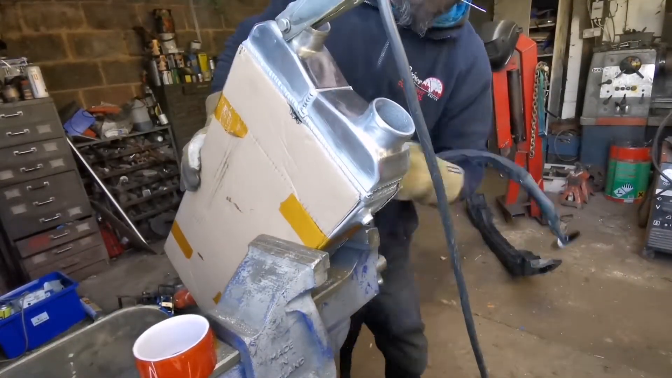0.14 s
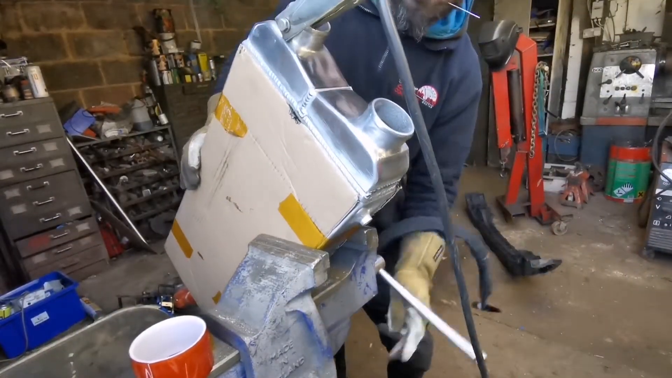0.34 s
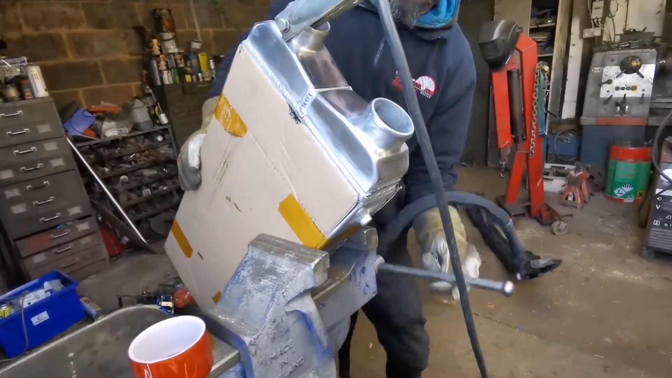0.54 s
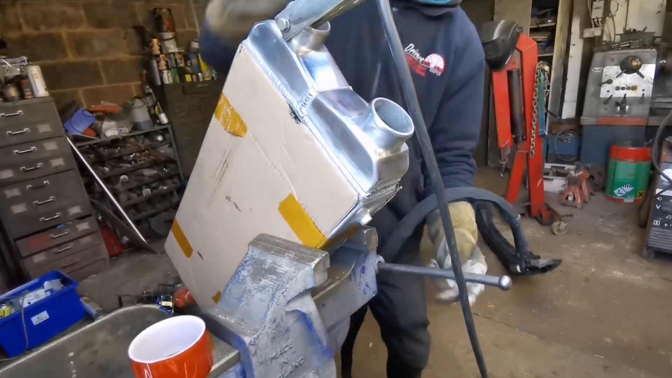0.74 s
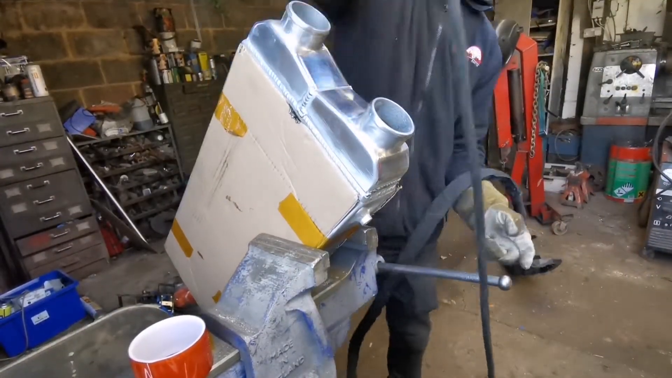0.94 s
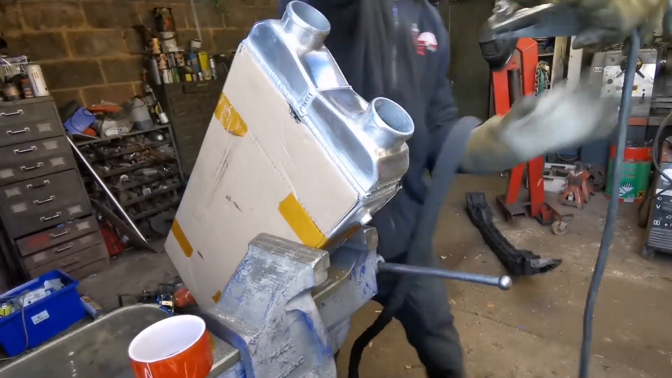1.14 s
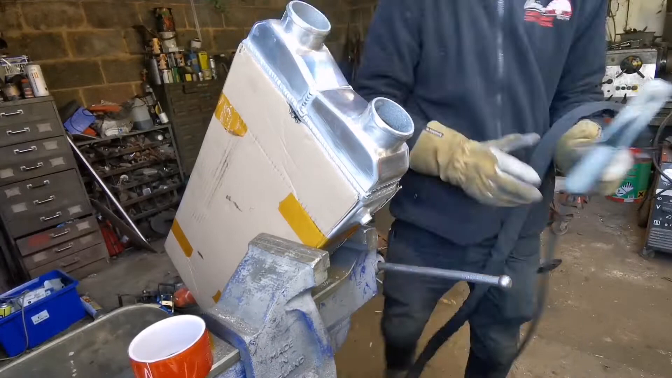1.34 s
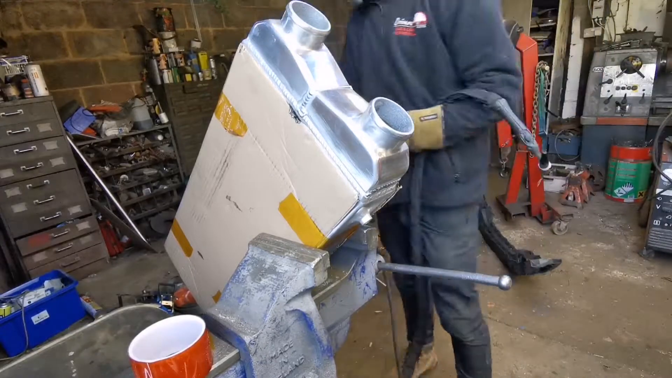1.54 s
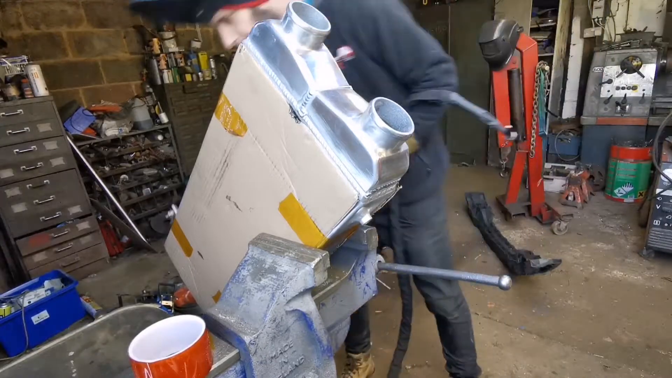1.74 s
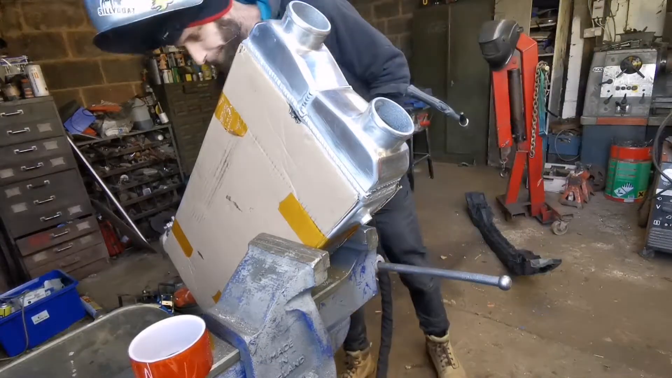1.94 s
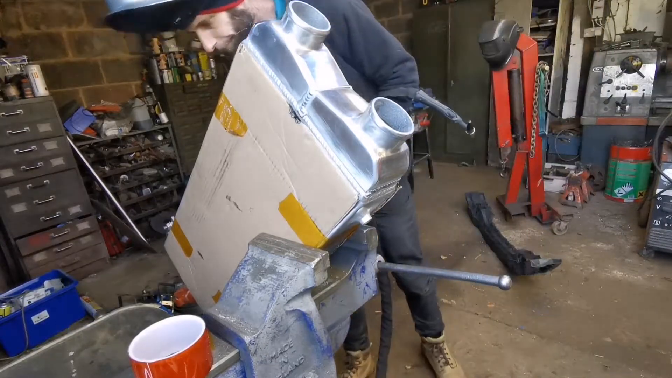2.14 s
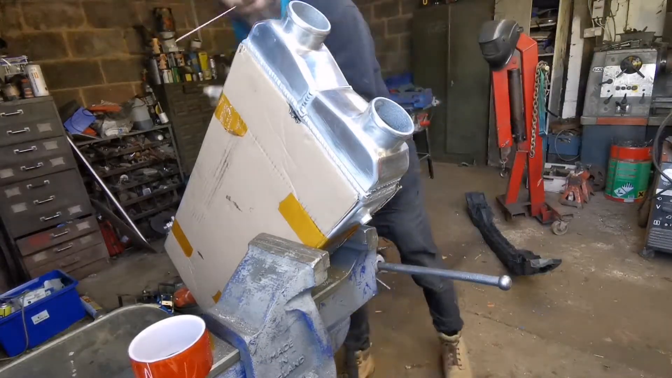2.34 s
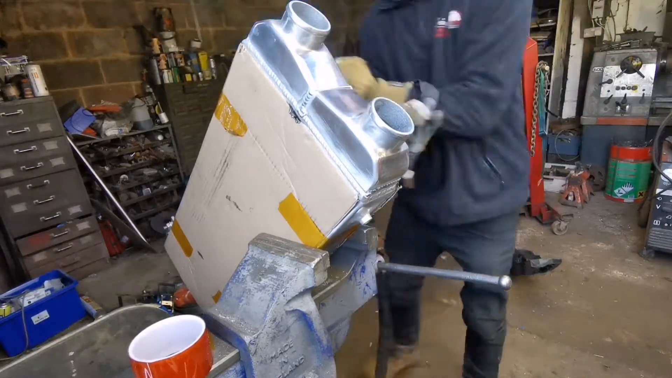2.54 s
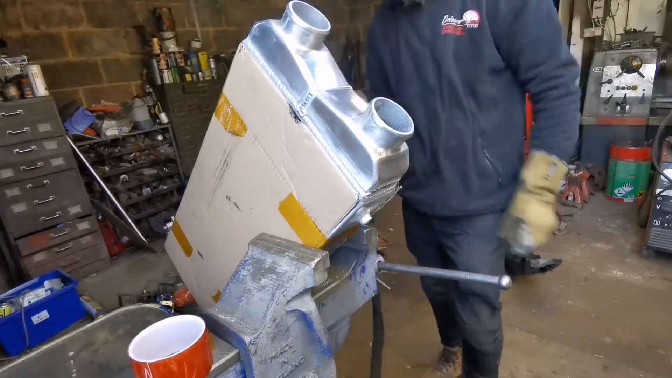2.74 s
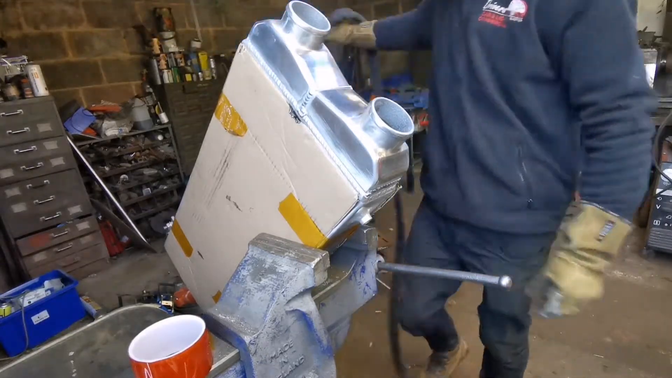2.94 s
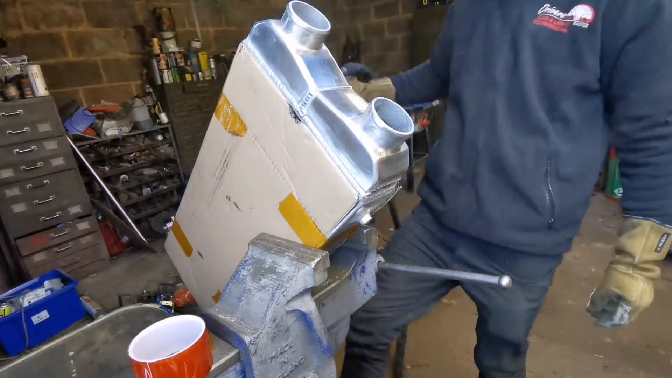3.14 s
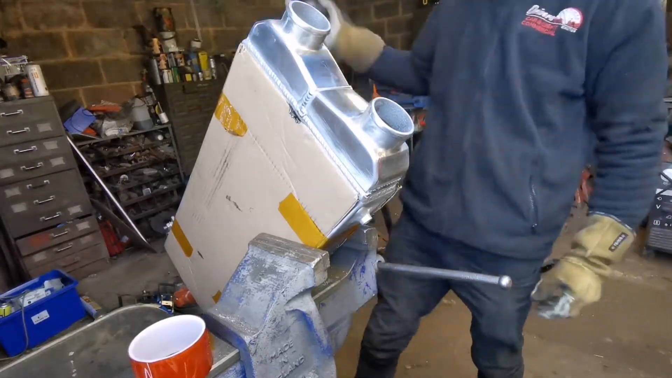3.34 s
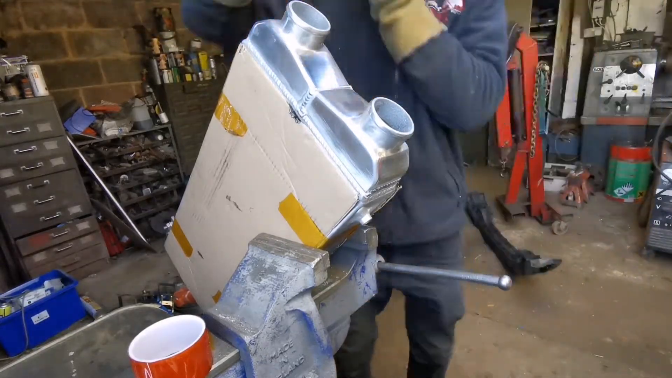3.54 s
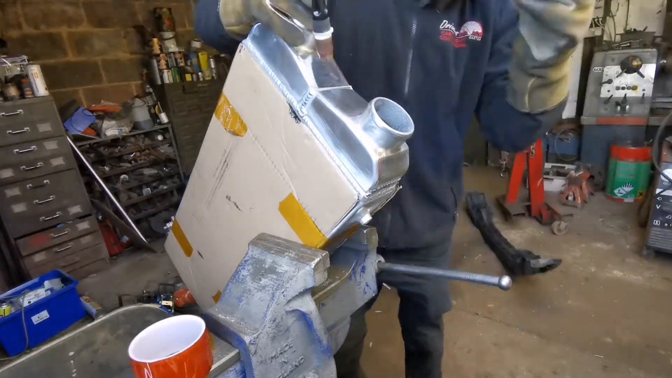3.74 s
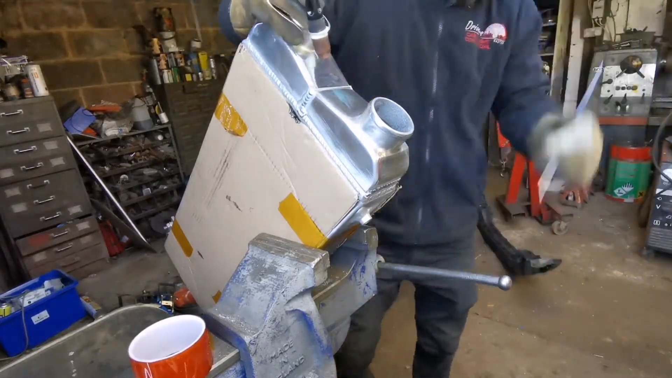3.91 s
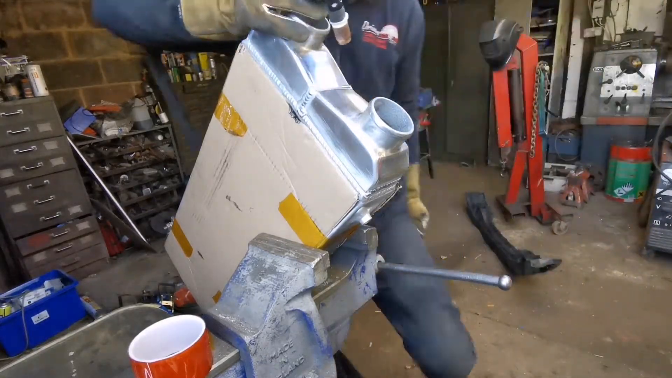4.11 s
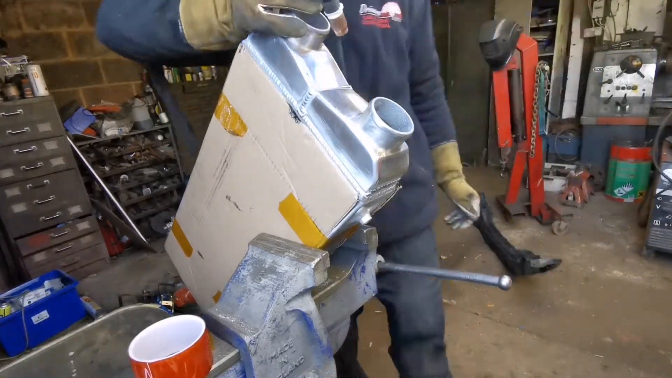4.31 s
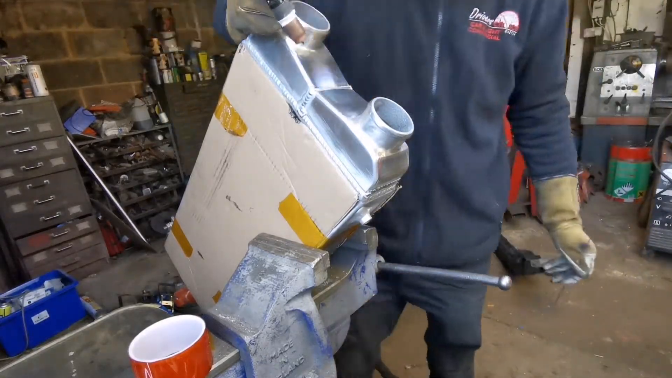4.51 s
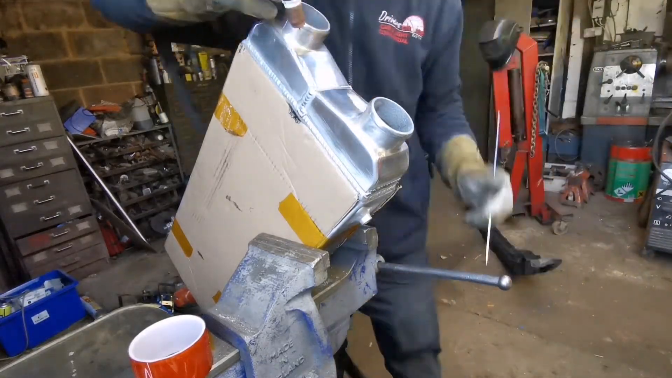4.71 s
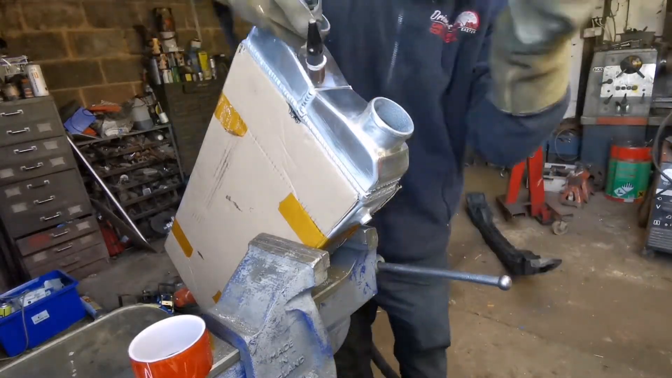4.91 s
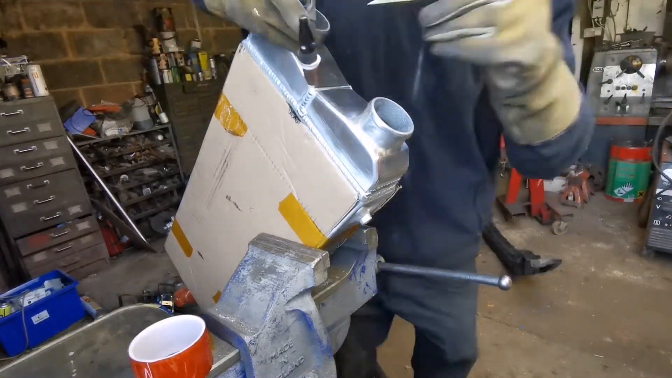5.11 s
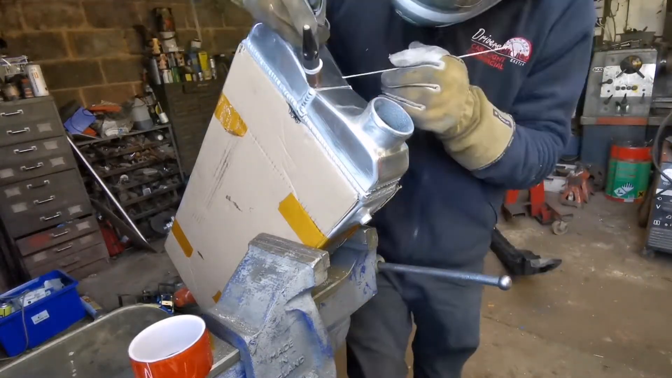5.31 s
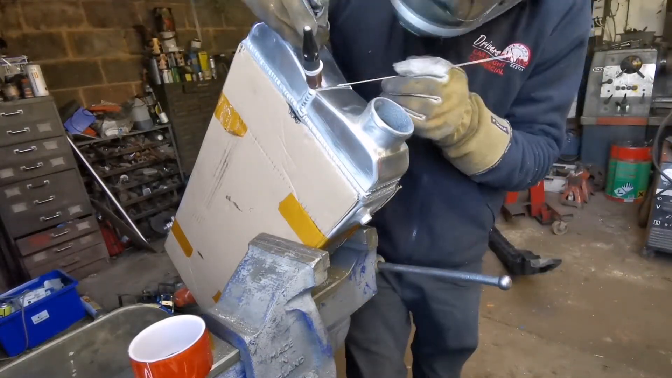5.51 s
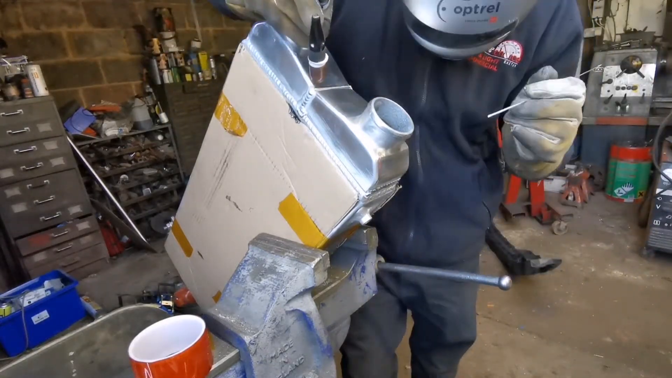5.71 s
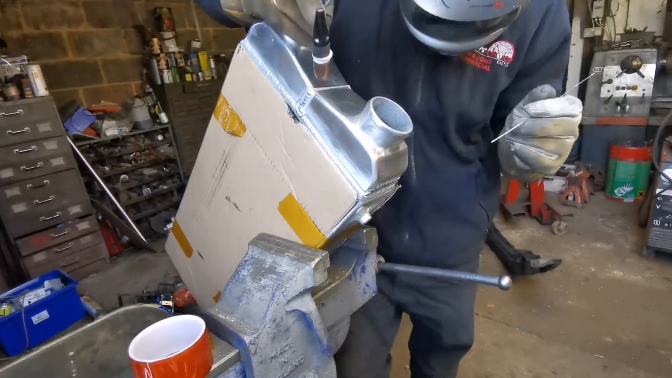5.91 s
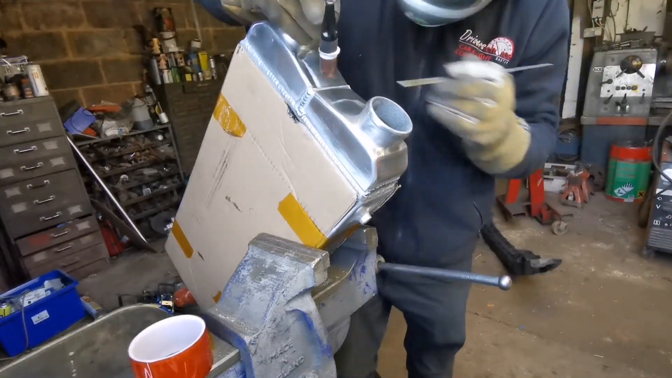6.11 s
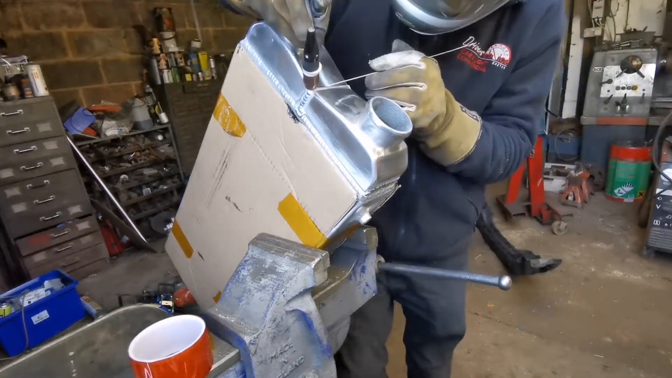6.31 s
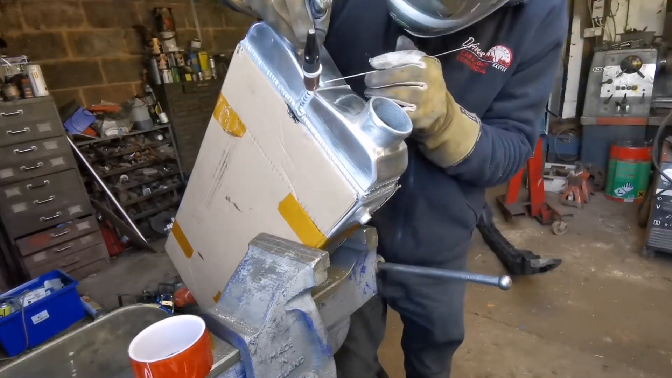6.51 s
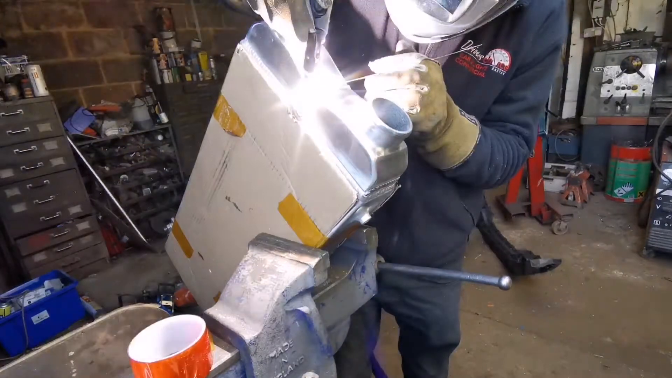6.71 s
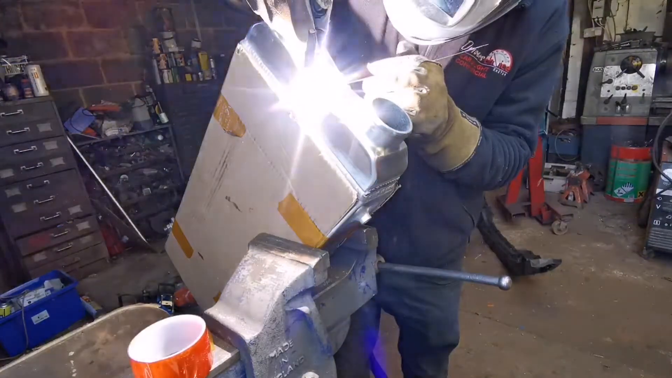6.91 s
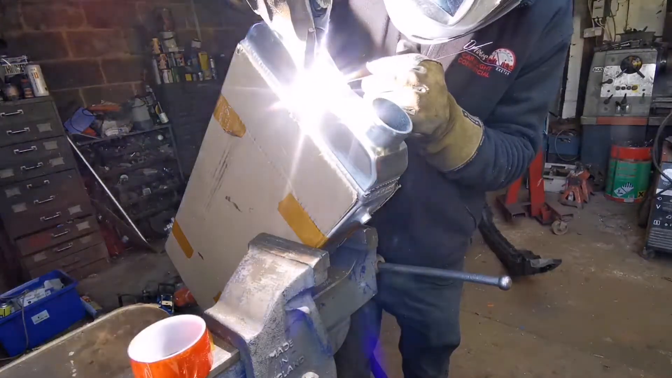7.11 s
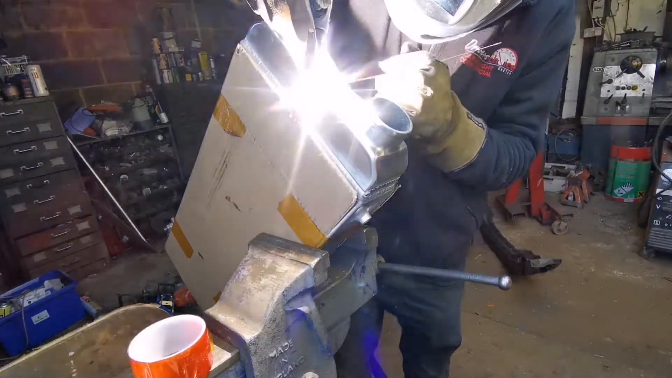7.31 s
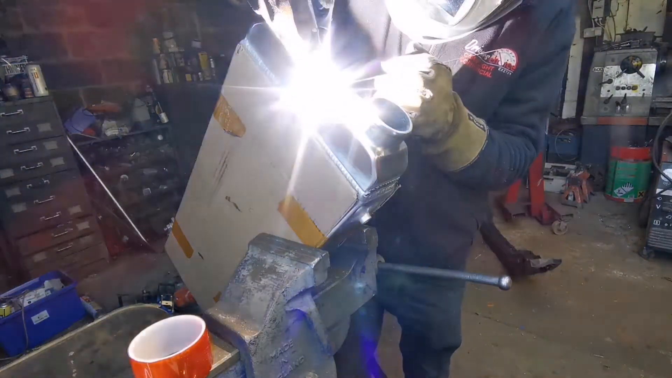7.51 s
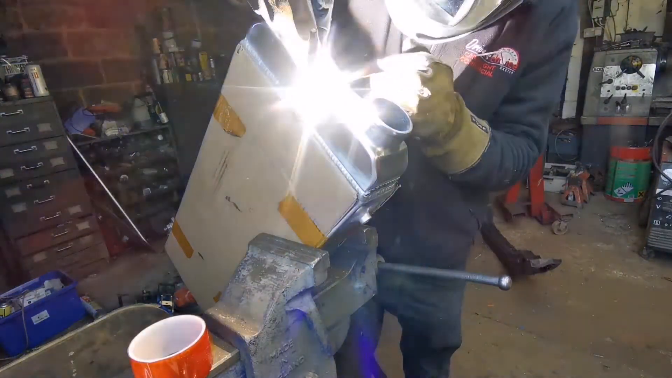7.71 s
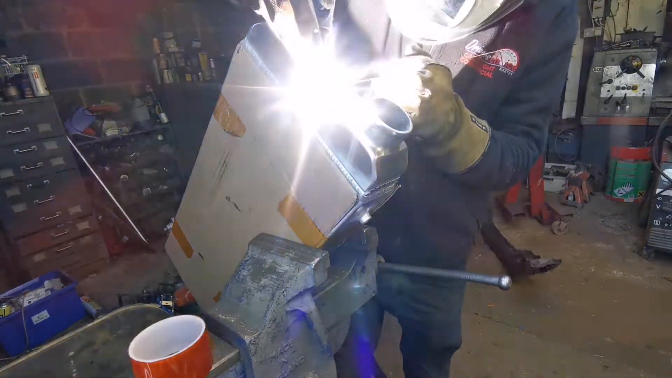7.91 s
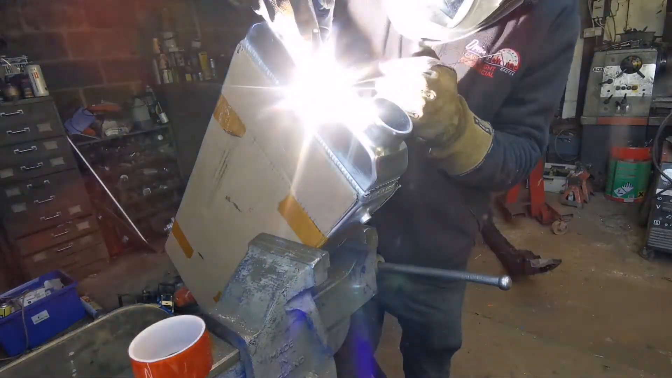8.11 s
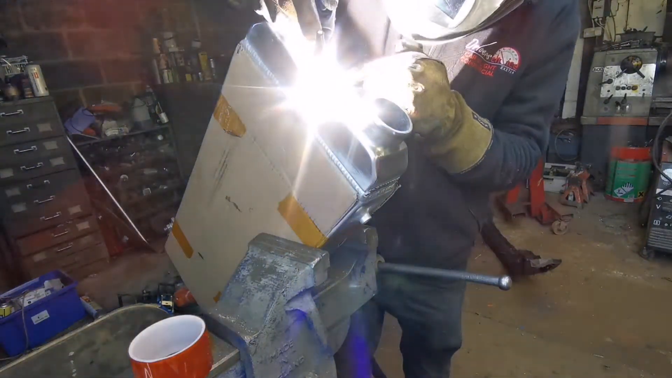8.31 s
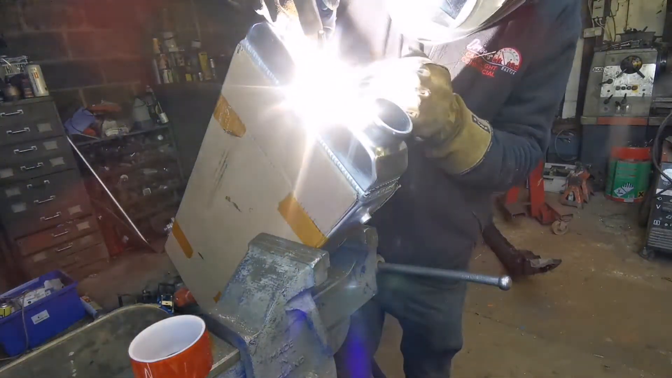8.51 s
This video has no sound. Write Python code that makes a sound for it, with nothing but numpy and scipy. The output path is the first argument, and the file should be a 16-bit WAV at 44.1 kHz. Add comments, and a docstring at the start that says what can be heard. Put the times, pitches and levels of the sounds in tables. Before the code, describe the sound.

Quiet preparations come first, with cloth and gloves brushing metal, a sharp double-toned clack, a cluster of hollow knocks and tiny torch ticks over constant fan rush. Then a welding arc ignites with a gas puff and sizzling pops, settling into a harsh low buzz with bright hissing snaps, its hum dipping rhythmically late on. Heard close up in a small hard-walled workshop, in stereo.

```python
"""A welder settles an aluminium tank in a vice and handles the torch, then strikes an AC TIG arc in a small workshop.
First, over the fan's steady filtered noise, struck modes boom and clink while noise bursts thud, scuff and clack.
A starting spark then frizzles with tiny oxide pops, and the arc holds: each reversal of the current snaps it, twice
a cycle, as a pulse train coloured into a hollow buzz and a hissing crackle, over a hum of two sines.
Last, rhythmic dabs of filler rod choke the hum. Two ports with different resonances pick up the whole."""
import sys
import numpy as np
from scipy import signal
from scipy.fft import rfft, irfft
from scipy.io import wavfile

SR = 44100
rng = np.random.default_rng(int(sys.argv[2]) if len(sys.argv) > 2 else 0)


def transcribe(signal):
    """Save signal, clipped to [-1, 1], as a 16-bit WAV file at the path in sys.argv[1]."""
    frames = np.atleast_2d(signal).T
    limited = np.clip(frames, -1, 1)
    pcm = np.round(limited * 32767).astype(np.int16)
    wavfile.write(sys.argv[1], SR, pcm)


N = 377055
T = np.arange(N) / SR

# the starting spark fires, then the arc holds (s)
SPARK_S, ARC_S = 6.526, 6.612
# the torch and filler rod touch metal: start_s, level_db, pitch_hz, t60_s
TOUCHES = [(3.017, -44.5, 4500, 0.05), (4.321, -39, 4590, 0.034), (4.322, -46, 2760, 0.063),
           (4.692, -47, 5740, 0.12), (4.694, -49, 4200, .06), (5.970, -46.5, 5460, 0.16)]


def undb(db):
    """Logarithmic level: decibels become an amplitude gain."""
    return 10 ** (np.asarray(db) / 20)


def unit(x):
    """Normalisation of power: scale to rms 1."""
    return x / np.sqrt(np.mean(x ** 2))


def convolve(x, response):
    """Linear superposition: every sample launches a scaled copy of the impulse response."""
    return signal.fftconvolve(x, response)[:len(x)]


def colour(x, points, column=1, size=8192):
    """Minimum-phase filtering: a folded cepstrum makes a causal response through (Hz, dB) points."""
    points = np.array(points, float)
    hz = np.maximum(np.fft.rfftfreq(size, 1 / SR), 1)
    level_db = np.interp(np.log(hz), np.log(points[:, 0]), points[:, column])
    cepstrum = irfft(np.log(undb(level_db)))
    cepstrum[1:size // 2] *= 2
    cepstrum[size // 2 + 1:] = 0
    return convolve(x, irfft(np.exp(rfft(cepstrum))))


def clicks(times, sizes, order=8):
    """Band-limited impulses: a windowed sinc places each one between samples."""
    out = np.zeros(N)
    index = (times * SR).astype(int)[:, None] + np.arange(1 - order, order + 1)
    offset = index - times[:, None] * SR
    kernel = np.sinc(offset) * np.sinc(offset / order)
    np.add.at(out, np.clip(index, 0, N - 1), (index < N) * sizes[:, None] * kernel)
    return out


def walk(rate):
    """Slow random fluctuation: lines join normal draws at the given rate per second."""
    knots = np.arange(0, T[-1] + 1, 1 / rate)
    return np.interp(T, knots, rng.standard_normal(len(knots)))


def add(out, s, sound):
    """Superposition: mix a short sound in at time s."""
    i = int(s * SR)
    out[i:i + len(sound)] += sound[:N - i]


def room(x, wet_db, t60, near_db, near_t60):
    """Exponential reverberation: direct sound, near scatter and the workshop's tail, in two channels."""
    t = T[:SR // 2]
    out = []
    for near_noise, tail_noise in rng.standard_normal((2, 2, len(t))):
        near = unit(near_noise * 1000 ** (-t / near_t60) * (t > .0003))
        tail = unit(tail_noise * 1000 ** (-t / t60) * (t > .006))
        response = (undb(near_db) * near + undb(wet_db) * tail) / np.sqrt(len(t))
        out.append(x + convolve(x, response))
    return np.array(out)


def smear(x, lag_s, share):
    """All-pass dispersion between two close faces: spread in time, colour unchanged."""
    delay = np.exp(-2j * np.pi * np.fft.rfftfreq(2 * N, 1 / SR) * lag_s)
    return irfft(rfft(x, 2 * N) * (delay - share) / (1 - share * delay))[..., :N]


def bursts(rows, top_hz):
    """Brief broadband excitation: grainy noise in one band, rolled off towards top_hz, swells and dies."""
    out, t = np.zeros(N), T[:SR // 4]
    hz = np.maximum(np.fft.rfftfreq(len(t), 1 / SR), 1)
    for s, db, centre_hz, octaves, rise, t60 in rows:
        grains = rng.standard_normal(len(t)) * undb(1.7 * rng.standard_normal(len(t)))
        band = np.exp(-.5 * (np.log2(hz / centre_hz) / octaves) ** 2 - (hz / top_hz) ** 4) / np.sqrt(hz)
        envelope = np.minimum(t / rise, 1) * 1000 ** (-np.maximum(t - rise, 0) / t60)
        noise = unit(irfft(rfft(grains) * band, len(t)))
        add(out, s, undb(db) * envelope * noise)
    return out


def fan():
    """Turbulent noise and arrival delay: the machine's fan, off to the right, reaches the left port later."""
    # spectrum of the rushing air: pitch_hz, level_db
    air_colour = [(25, -2.5), (60, -4.5), (130, 5), (195, -4), (310, 4), (370, -3), (440, 5), (530, -4),
                  (630, 0.5), (800, -11.5), (1020, -9), (1250, -18), (2300, -21), (4000, -27.5),
                  (6500, -30.5), (8500, -37.5), (15500, -44)]
    direct, *diffuse = rng.standard_normal((3, N))
    late = np.interp(T - .0005, T, direct)
    # the walls blur it: a separate noise for each port, strongest in the treble
    spread = [colour(d, [(100, -19.5), (600, 3.5), (2000, 10.5), (8000, 9.5)]) for d in diffuse]
    air = np.array([colour(d + s, air_colour) for d, s in zip((late, direct), spread)])
    return unit(air) * undb(-51.5 + .5 * walk(6.5))


def contacts(count=4):
    """Contact noise: thuds, scuffs, chance rustles, clacks and ticks each have their own shape of burst."""
    # boots and the cable thud on the floor: start_s, level_db, centre_hz
    thud_rows = [(0.071, -46.5, 60), (.44, -40, 65), (1.87, -43, 85), (3.013, -40.5, 125),
                 (4.24, -46, 98.5), (4.739, -44, 130), (5.035, -43, 130)]
    thud_octaves, thud_rise_s, thud_t60_s = 1, 0.0024, 0.067
    thuds = [(s, db, hz, thud_octaves, thud_rise_s, thud_t60_s) for s, db, hz in thud_rows]
    # gloves and sleeves scuff over metal: start_s, level_db, centre_hz, rise_s
    scuff_rows = [(.084, -49.5, 2970, 0.0029), (.426, -52.5, 5000, 0.011), (.878, -46.5, 3200, 0.01),
                  (.902, -45.5, 2600, 0.0029), (1.225, -58, 5500, 0.0054), (1.616, -57.5, 9000, 0.0076),
                  (1.915, -51, 6540, 0.0085), (3.018, -45.5, 1800, 0.0019), (3.535, -56.5, 4500, 0.0099),
                  (4.06, -59, 7500, .006), (4.255, -50.5, 1700, 0.014), (4.305, -47, 2400, 0.015),
                  (4.424, -52.5, 1600, .014), (4.684, -49.5, 8500, 0.0093), (4.733, -46.5, 2200, 0.0017),
                  (5.03, -51, 5000, 0.0063), (5.956, -50, 6000, 0.013)]
    # fainter rustles of clothing come by chance before the spark
    rustle_db, rustle_hz, rustle_rise_s = -59, 4000, 0.0074
    rustles = [(s, rustle_db, rustle_hz, rustle_rise_s) for s in rng.random(count) * SPARK_S]
    # a longer stroke dies more slowly
    scuff_octaves, scuff_t60_s, t60_per_rise = 1.76, 0.048, 7.2
    scuffs = [(s, db, hz, scuff_octaves, rise, scuff_t60_s + t60_per_rise * rise)
              for s, db, hz, rise in scuff_rows + rustles]
    # hard parts of the torch and helmet, some in two bands: start_s, level_db, centre_hz, width_octaves, t60_s
    clack_rows = [(.2325, -44, 11000, 0.16, 0.015), (0.232, -49.5, 4530, 0.58, 0.017),
                  (1.329, -50.5, 1500, 1.3, 0.019), (1.81, -35.5, 2350, 0.48, .077),
                  (1.81, -34.5, 4160, 0.32, .064), (5.214, -45, 1340, 1.13, 0.057)]
    clack_rise_s = 0.00084
    clacks = [(s, db, hz, octaves, clack_rise_s, t60) for s, db, hz, octaves, t60 in clack_rows]
    # each touch of torch or rod begins with a short tick around its own pitch
    tick_db, tick_octaves, tick_t60_s = -2, 0.94, 0.024
    ticks = [(s, db + tick_db, hz, tick_octaves, clack_rise_s, tick_t60_s) for s, db, hz, _ in TOUCHES]
    return bursts(thuds + clacks + scuffs + ticks, top_hz=14200)


def ring(modes, centre_hz, octaves):
    """Modal synthesis: decaying modes of alternating sign; the place of the blow favours one pitch."""
    t = T[:SR // 2]
    out = np.zeros(len(t))
    for k, (hz, db, t60) in enumerate(modes):
        favour = 1 / (1 + (np.log2(hz / centre_hz) / octaves) ** 2)
        out += (-1) ** k * undb(db) * favour * np.sin(2 * np.pi * hz * t) * 1000 ** (-t / t60)
    return out


def tank_booms(count=3):
    """Hertz-like soft impact: a longer contact push dulls the tank's modes, and rebounds repeat the blow."""
    # modes of the hollow tank: pitch_hz, level_db, t60_s
    tank_modes = [(75, -8, .07), (120, 1, 0.12), (279, 1.5, 0.076), (320.6, -1, 0.083), (396, -1.5, 0.21),
                  (581, -2.5, 0.05), (907, -7, 0.093), (1290, -24, .07), (2050, -28, .07)]
    # soft blows: start_s, level_db, contact_s, favoured_hz, rebound_loss_db
    blows = [(.888, -45, .0005, 750, 10), (3.015, -36.5, .0009, 404, 7.5), (4.007, -27.5, 0.0021, 320, 4),
             (4.19, -38.5, 0.0015, 310, 2), (4.234, -33, 0.0014, 296, 14), (4.241, -26, .0009, 290, 4),
             (4.273, -33.5, 0.00082, 385, 18), (4.304, -30, .00073, 246, 15),
             (4.424, -29.5, 0.0014, 372, 4), (4.736, -34.5, 0.00086, 476, 16),
             (5.031, -44.5, .0011, 348, 6), (5.827, -42, .00089, 600, 13), (5.975, -46, .001, 350, 3),
             (6.067, -36, .0026, 226, 13)]
    # the tank rocks in the vice and is hit again; each further gap is shorter by the ratio
    rebound_s, rebound_ratio = 0.00603, 0.852
    out, t = np.zeros(N), T[:SR // 4]
    for s, db, contact, centre_hz, loss_db in blows:
        push = np.sin(np.pi * np.minimum(t / contact, 1)) ** 2
        boom = convolve(ring(tank_modes, centre_hz, 0.56), push / push.sum())
        for k in range(count):
            later = rebound_s * np.sum(rebound_ratio ** np.arange(k))
            add(out, s + later, undb(db - k * loss_db) * boom)
    return out


def metal_clinks():
    """Free vibration of small parts: the handle rings in several modes, each touch in one damped sine."""
    # modes of the steel vice handle: pitch_hz, level_db, t60_s
    handle_modes = [(3850, -10.5, 0.087), (5981, -23, 0.097), (6282, -2, 0.085), (9205, -15, 0.1),
                    (12560, -29, 0.055)]
    # the handle slides home and chatters: start_s, level_db
    chatter = [(.428, -45), (.435, -36), (.442, -37.5)]
    out, t = np.zeros(N), T[:SR // 4]
    for s, db in chatter:
        add(out, s, undb(db) * ring(handle_modes, 6300, 3))
    for s, db, hz, t60 in TOUCHES:
        attack = np.minimum(t / 0.0016, 1)
        add(out, s, undb(db) * np.sin(2 * np.pi * hz * t) * attack * 1000 ** (-t / t60))
    return out


def handling():
    """Reverberant mixing: booms, clinks and contact noise each get their own share of scatter and tail."""
    booms = undb(-0.5) * room(tank_booms(), -11.5, 0.15, -5.5, 0.032)
    clinks = room(metal_clinks(), -22, .25, -8, .02)
    touches = undb(-1.0) * room(contacts(), -17, 0.2, -0.86, 0.047)
    return booms + clinks + touches


def oxide():
    """Superposed level curves: nominal sputter level in dB, steady on the oxide skin and flaring in patches."""
    # patches flare up: centre_s, rise_db over the steady sputter, half_length_s (to 1/e)
    flares = [(6.88, 5, .04), (6.967, 6.5, .02), (7.116, 5, 0.1), (7.296, 5, 0.033), (7.71, 3.5, 0.058)]
    skin_db = -42
    return skin_db + sum(db * np.exp(-((T - s) / half) ** 2) for s, db, half in flares)


def sputter(count=70000):
    """Random impulse noise: oxide bursts in tiny pops, already frizzling from the starting spark."""
    # spectrum of the pops: pitch_hz, level_db
    pop_colour = [(30, -50), (90, -19), (250, -8), (480, -27), (700, -5.5), (1300, -1), (2050, 4),
                  (2350, -2.5), (2750, 1), (3080, -1.5), (3500, 0.5), (4600, 3.5), (5700, 0), (7000, -5),
                  (11000, 3), (15500, -10)]
    # gas puffs as the arc catches, oxide spits: start_s, level_db (before a trim), centre_hz, width_octaves,
    # rise_s, t60_s
    spits = [(6.533, -38.5, 5460, 0.63, 0.046, 0.73), (6.55, -37, 9050, 0.82, .002, 0.026),
             (6.581, -31, 1190, 0.99, 0.021, 0.12), (6.583, -32.5, 2820, 1.2, 0.011, .13),
             (7.28, -38, 3200, 1.2, 0.008, 0.18), (7.725, -39, 4000, 2.9, 0.0033, 0.051),
             (7.752, -23.5, 3000, 1.9, 0.0017, 0.016)]
    when, size, sign = rng.random((count, 3)).T
    # many small pops and few large ones, of either sign
    pops = clicks(when * T[-1], np.sign(sign - .5) * undb(-4 * np.log(size + .005)))
    onset = np.clip((T - SPARK_S) / 0.025, 0, 1) ** 2
    frizzle = unit(colour(pops, pop_colour)) * onset * undb(oxide() + 1.5)
    puffs = bursts(spits, top_hz=18000) * undb(-4)
    return room(frizzle + puffs, 0.5, 0.033, -1.4, 0.015)


def dabs(count=4):
    """Periodic modulation: how deep the filler rod is in the pool, 0 to 1, in a steady rhythm."""
    first_s, every_s, half_s = 7.495, 0.359, 0.057  # each dab falls to 1/e after half_s
    return sum(np.exp(-((T - first_s - k * every_s) / half_s) ** 2) for k in range(count))


def brighten(x):
    """Spectral tilt in time: the part above a split rises steadily once the arc holds, as the pool opens."""
    split_hz, lift_db_per_s = 1200, 2.1
    low = signal.sosfiltfilt(signal.butter(2, split_hz, fs=SR, output="sos"), x)
    return low + (x - low) * undb(lift_db_per_s * np.maximum(T - ARC_S, 0))


def arc_hum(ac_hz, pool, dab):
    """Harmonic pair: the hum at the current's frequency sinks with each dab while its octave stays steady."""
    hum_db, octave_db, dab_drop_db = -49.5, -48, 24
    turn = 2 * np.pi * ac_hz * T
    fundamental = unit(np.sin(turn)) * undb(hum_db - dab_drop_db * dab)
    octave = unit(np.sin(2 * turn)) * undb(octave_db)
    return pool ** 2 * (fundamental + octave)


def arc_buzz(times, pulse_db, pool, dab):
    """Source and filter: pulses at the reversals excite the hollow tone beside the tank."""
    # hollow tone: pitch_hz, left_db, right_db
    hollow_colour = [(139, -31, -45), (263, -24, -17), (400, -8, -21.5), (527, -19, -10), (631, 4, -1),
                     (743, -6, -9.5), (926, -0.5, -6.5), (1030, -10, -14), (1165, -5, -6.5),
                     (1430, 2.5, -9), (1586, -10.5, -3), (1760, -3.5, -11.5), (2036, -4, 0.5),
                     (2230, -17.5, -29), (3150, -48, -37.5)]
    # course of the buzz, before a trim and brightening: time_s, level_db
    level_points = [(6.66, -39), (6.696, -54), (6.732, -38), (6.882, -33), (7.086, -32.5), (7.264, -36.5),
                    (7.3, -31.5), (7.378, -38.5), (7.45, -32), (7.764, -35.5), (7.93, -31), (8.154, -33.5),
                    (8.196, -30.5), (8.446, -33.5), (8.53, -30.5)]
    level_s, level_db = np.transpose(level_points)
    dab_swell_db = 0.4
    buzz_db = np.interp(T, level_s, level_db) + dab_swell_db * dab
    pulses = clicks(times, undb(pulse_db))
    buzz = np.array([colour(pulses, hollow_colour, column=c) for c in (1, 2)])
    return brighten(unit(buzz)) * pool * undb(buzz_db - 1.9)


def arc_crackle(times, bite):
    """Impulsive radiation with reflection: an uneven snap, its mirrored sound and a brief gas hiss."""
    # spectrum of snap and hiss: pitch_hz, level_db
    snap_colour = [(80, -32), (400, -10.5), (2250, -19), (2650, -3), (3050, -9), (3550, -0.5), (4800, -4),
                   (5600, -8.5), (6300, -3.5), (7000, 5), (8400, -2), (10000, 1.5), (10600, 7.5),
                   (11600, -0.5), (13000, 1.5), (15500, -9)]
    # direct snap is strongest on cold metal and eases as the tank heats
    start_db, ease_db_per_s = -34.5, 1.58
    strikes = clicks(times, undb(2.7 * bite))
    snap = unit(smear(colour(strikes, snap_colour), 0.000144, 0.098))
    # the tank face mirrors the snap into the shop; the path changes as the torch moves
    mirrored = np.interp(T - .0004 - 5e-5 * walk(3), T, snap)
    around = room(mirrored, -0.5, 0.3, 0, 0.0025)
    direct = np.array([snap, np.interp(T - 6e-5, T, snap)])  # right port slightly later
    # the gas hisses briefly after every strike
    gas = convolve(strikes, np.exp(-T[:SR // 50] / 0.00049))
    hiss = np.array([colour(n * gas, snap_colour) for n in rng.standard_normal((2, N))])
    crackle = direct + undb(-5) * around + undb(-7) * unit(hiss)
    lit = np.clip((T - ARC_S) / 0.019, 0, 1)
    return crackle * lit * undb(start_db - ease_db_per_s * (T - ARC_S))


def arc():
    """Current-driven pulsation: two pressure pulses a cycle drive buzz and crackle over the hum."""
    ac_hz, balance_share = 130.73, .352  # welding current; share of the cycle electrode positive
    cycles = np.arange(int(T[-1] * ac_hz))
    times = (cycles[:, None] + [0, balance_share]).ravel() / ac_hz
    # the arc grows restless as the sputter rises above this level
    calm_db = -46
    unrest = np.interp(times, T, undb(1.35 * (oxide() - calm_db)))
    early, swell, bite = rng.standard_normal((len(times), 3)).T
    # the arc root wanders over the pool, so the pulses come a little early or late
    wander = 2.2e-5 * np.interp(times, T, walk(14))
    times = np.abs(times + wander + 4e-6 * early * unrest)
    pool = np.clip((T - ARC_S) / 0.14, 0, 1)  # buzz and hum fill out as the metal melts
    dab = dabs()
    buzz = arc_buzz(times, 0.97 * swell * unrest, pool, dab)
    return buzz + arc_hum(ac_hz, pool, dab) + arc_crackle(times, bite)


def scene():
    """Superposition of sources: handling, then sputter and arc, over the fan."""
    return fan() + handling() + sputter() + arc()


def record(dry):
    """Port resonance: each port colours its channel differently, and a steep low-pass cuts the top."""
    # resonances of the two ports: pitch_hz, left_db, right_db
    port_colour = [(225, 2.5, 1.5), (437, 3, 1), (790, 4, 1.5), (1150, 1, 2), (2890, 2, 2.5),
                   (3630, -5.5, 3), (4600, -3.5, 4.5), (5480, -5, 2.5), (6800, -13.5, 10), (7630, -10, -3),
                   (8500, -2, -3.5), (9900, 2.5, -7), (12200, 4.5, -3.5), (14900, 2.5, 5)]
    top_hz = 15750
    ports = np.array([colour(dry[c], port_colour, column=c + 1) for c in (0, 1)])
    return signal.sosfilt(signal.ellip(10, .2, 80, top_hz, fs=SR, output="sos"), ports)


dry = scene()
out = record(dry)
transcribe(out)
```